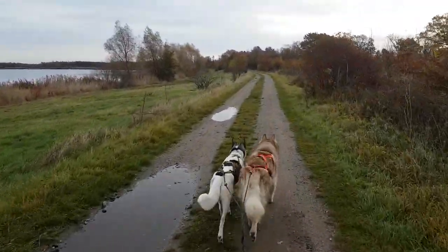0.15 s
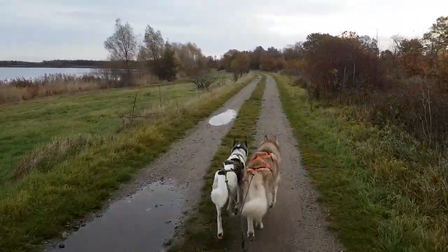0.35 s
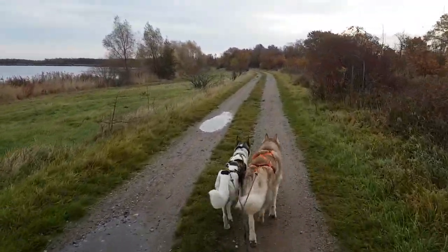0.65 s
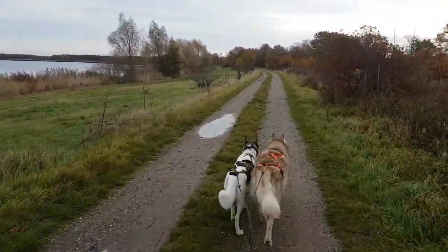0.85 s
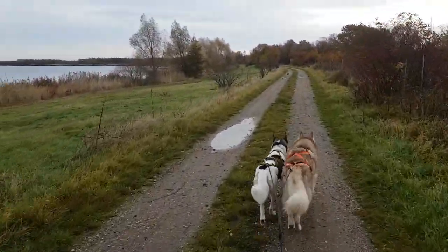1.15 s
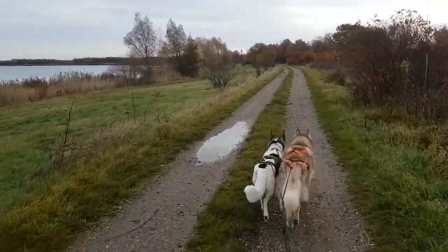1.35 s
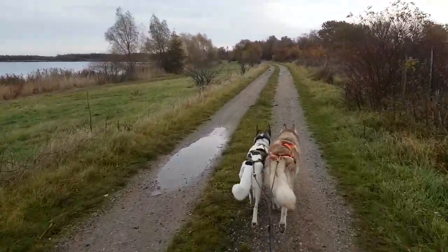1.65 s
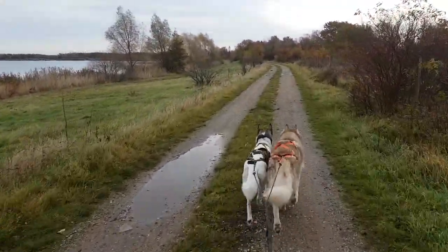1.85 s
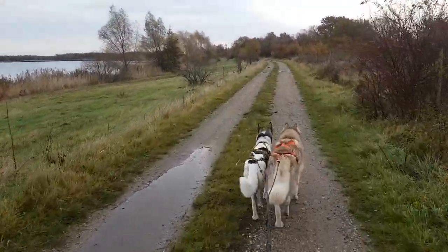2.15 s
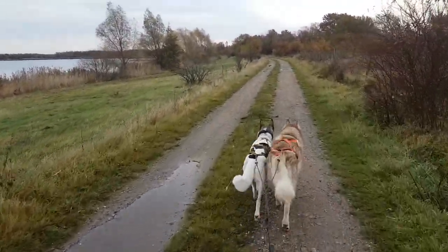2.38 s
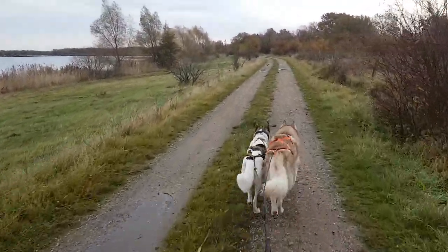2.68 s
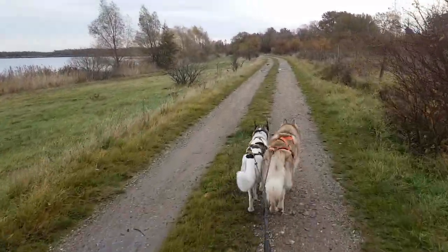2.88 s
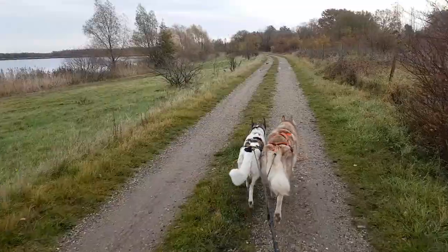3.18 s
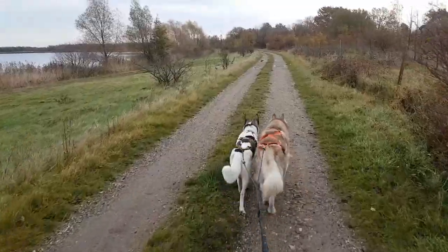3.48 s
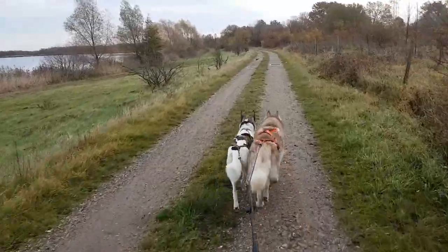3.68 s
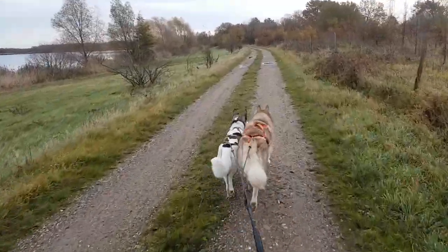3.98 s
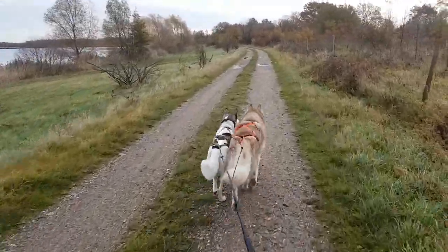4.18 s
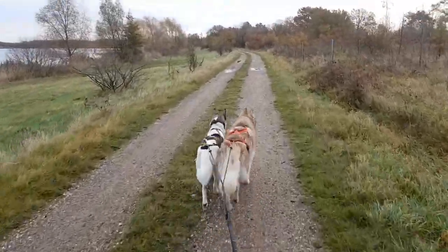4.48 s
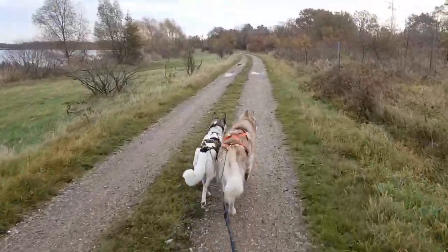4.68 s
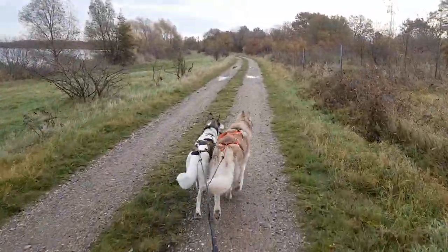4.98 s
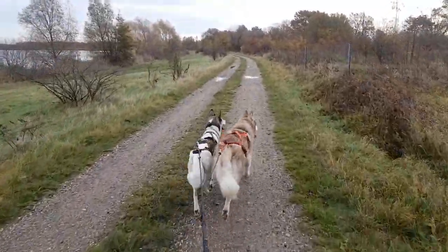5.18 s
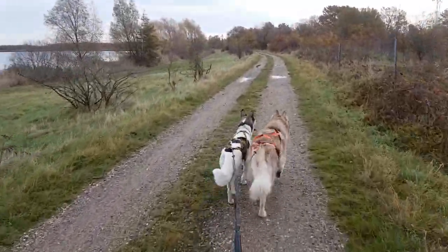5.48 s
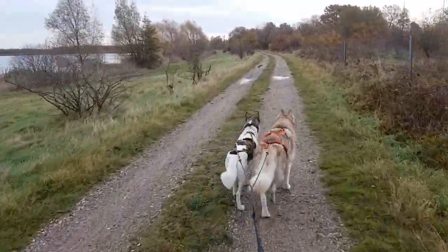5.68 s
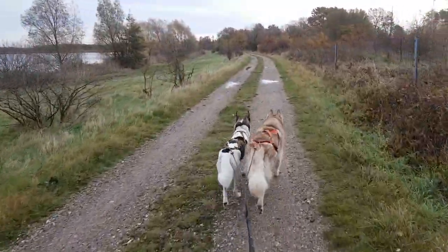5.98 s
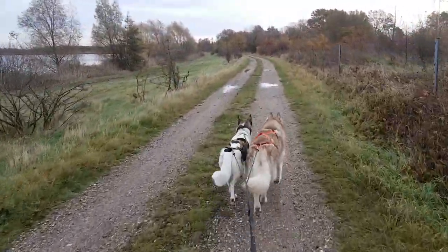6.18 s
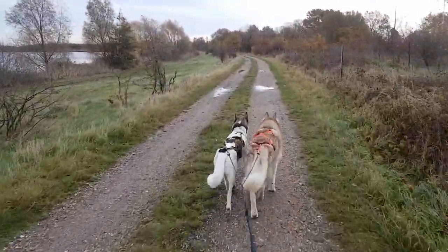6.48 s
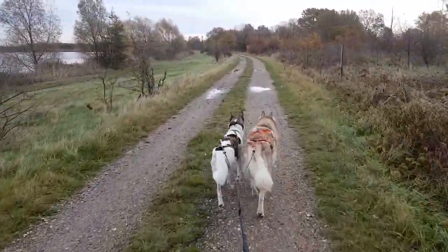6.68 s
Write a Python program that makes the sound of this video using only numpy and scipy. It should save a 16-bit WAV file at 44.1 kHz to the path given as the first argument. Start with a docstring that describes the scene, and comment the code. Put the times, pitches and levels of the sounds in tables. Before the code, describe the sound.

A dog-drawn cart rolls along a gritty track: dense crunching grains, snapping pebbles, hissing wet sand, dull jolts and a faint low rumble.

```python
"""Damp gravel crunches under the tyres of a small cart pulled by two dogs, heard from the rider's place.
The crunch is a dense random rain of grain clicks; larger stones grind as shaped noise, then snap and knock.
Pebbles tick and rebound, sand hisses and specks click as coloured noise, and the tyres drone likewise.
Jolts are short decaying tones, and low noise is the moving air that buffets two microphone ports."""
import sys
import numpy as np
from scipy import signal
from scipy.fft import rfft, irfft, next_fast_len
from scipy.io import wavfile
from scipy.ndimage import uniform_filter1d, map_coordinates

SR = 44100
rng = np.random.default_rng(int(sys.argv[2]) if len(sys.argv) > 2 else 0)


def store_pcm(level_fs):
    """Save levels as 16-bit WAV."""
    pcm = np.round(np.clip(level_fs, -1, 1) * 32767).astype(np.int16)
    wavfile.write(sys.argv[1], SR, np.atleast_2d(pcm).T)


N = 302085


def amp(db):
    """Turn dB into a plain gain."""
    return 10 ** (np.asarray(db) / 20)


def unit(x):
    """Scale x to an average strength (rms) of 1."""
    return x / np.sqrt(np.mean(x ** 2) + 1e-20)


def along(points, hz):
    """Read a curve of (Hz, value) points on a log frequency axis."""
    f, v = np.transpose(points)
    return np.interp(np.log(hz + 1), np.log(f + 1), v)


def curves(rows):
    """One value per sample for each column after the time."""
    s, *cols = np.transpose(rows)
    return [np.interp(np.arange(N) / SR, s, c) for c in cols]


def wobble(rate):
    """A smooth random curve with rate knots a second."""
    knots = rng.standard_normal(int(N * rate / SR) + 4)
    return map_coordinates(knots, [np.arange(N) * rate / SR])


def swells(rows):
    """Summed power of (centre s, dB, length s) events; length is the time spent above half power."""
    t = np.arange(0, N, 20) / SR
    power = sum(amp(db) ** 2 * .5 ** ((2 * (t - s) / length) ** 2) for s, db, length in rows)
    return np.interp(np.arange(N) / SR, t, power)


def filtered(x, response):
    """Shape the spectrum of x by a response of frequency."""
    m = next_fast_len(x.shape[-1] + SR // 4)
    spectrum = rfft(x, m) * response(np.fft.rfftfreq(m, 1 / SR))
    return irfft(spectrum, m)[..., :x.shape[-1]]


def add(track, s, sound):
    """Mix a stereo sound in at s seconds."""
    room = track[:, max(round(s * SR), 0):][:, :sound.shape[1]]
    room += sound[:, :room.shape[1]]


def lean(right_db):
    """Left and right gains that favour the right port by right_db in all."""
    return amp(np.array([-right_db, right_db]) / 2)


def rush(spectrum, alike):
    """Coloured stereo noise of rms 1; alike says how similar left and right are at each frequency."""
    def shape(hz):
        turn = np.arccos(np.clip(along(alike, hz), -1, 1)) / 2
        return amp(along(spectrum, hz)) * [np.cos(turn), np.sin(turn)]

    mid, side = filtered(rng.standard_normal((2, N)), shape)
    return unit(np.array([mid + side, mid - side]))


def click(spectrum, shape_db, port_db, lag_ms, scatter_ms, size=1024, count=33):
    """A stone's stereo click of energy 1: its shape bends the colour, its place shifts the ports in time."""
    hz = np.fft.rfftfreq(size, 1 / SR)
    places = [np.linspace(0, count - 1, len(hz))]
    own, left, right = [map_coordinates(k, places) for k in rng.standard_normal((3, count))]
    # short waves differ more between the ports
    ports = np.array([left, right]) * port_db * np.sqrt(np.minimum(hz / 6000, 1))
    cepstrum = irfft(np.log(amp(along(spectrum, hz) + shape_db * own + ports)))
    cepstrum[:, 1:size // 2] *= 2  # causal: a sharp start, then the ring
    cepstrum[:, size // 2 + 1:] = 0
    lag = (lag_ms + scatter_ms * rng.standard_normal()) / 1000
    delay = 6 / SR + np.array([[-lag], [lag]]) / 2
    wave = irfft(np.exp(rfft(cepstrum) - 2j * np.pi * hz * delay))[:, :size // 2]
    return wave / np.sqrt(np.sum(wave ** 2) / 2)


def crunch(level, per_second, size_db, clump_db, flutter_db, count=20):
    """Grit of many shapes is crushed in little clumps; the forces vary at random from grain to grain."""
    # The colour of crushed grit. Each row: frequency in Hz, level in dB per Hz.
    grit_colour = [(150, -24), (550, -12.5), (1000, -5), (1400, -8), (1920, -8), (2060, -1.5), (2300, 4.5),
                   (2600, -5), (2920, 5), (3200, 1), (3450, 3.5), (4000, -3.5), (5000, -15.5), (5800, -10),
                   (7200, -40), (9500, -31), (16000, -24)]
    hit = rng.random(N) < per_second / SR
    force = hit * amp(size_db * np.minimum(rng.standard_normal(N), 2) + clump_db * wobble(140))
    # the grains under a tyre share its load, so one large grain relieves its neighbours
    force /= np.sqrt(np.abs(uniform_filter1d(force ** 2, size=1500)) + 1e-9)
    shape = rng.integers(count, size=N)
    grit = np.zeros((2, N))
    for k in range(count):
        grain = click(grit_colour, shape_db=4.5, port_db=4.0, lag_ms=0.021, scatter_ms=0.042)
        own_force = force * (shape == k)
        grit += signal.oaconvolve(own_force[None], grain, axes=1)[:, :N]
    return unit(grit) * level * amp(flutter_db * wobble(45))


def contact_db():
    """The tyres skip or meet bare earth, and the crunch eases in these lulls."""
    # The lulls. Each row: centre in seconds, change in dB, length in seconds between half-depth points.
    lulls = [(1.607, -6, 0.069), (2.272, -4.5, 0.13), (2.546, -9, 0.065), (2.693, -4.5, .05),
             (3.045, -3.5, 0.047), (3.546, -10, 0.026), (4.155, -10, 0.02), (4.219, -11, 0.026),
             (4.341, -14, 0.045), (4.774, -14, 0.043), (5.316, -7, 0.038), (5.613, -5.5, .06),
             (6.02, -9.5, 0.11), (6.15, -10, 0.028)]
    t = np.arange(0, N, 20) / SR
    change_db = sum(db * .5 ** ((2 * (t - s) / length) ** 2) for s, db, length in lulls)
    return np.interp(np.arange(N) / SR, t, change_db)


def stone_colour(ring_hz):
    """The colour that all stones share, with this one's own resonance on top."""
    # The shared colour of snapping stones. Each row: frequency in Hz, level in dB per Hz.
    shared_colour = [(150, -19), (600, -23), (1400, -8), (1900, -2), (2300, 2), (2650, -2), (3300, 1.5),
                     (4000, -3), (5000, -9), (7000, -27), (14000, -21), (17000, -24)]
    height_db, half_width_octaves = 6.5, 0.26
    hz = np.geomspace(100, SR / 2, 90)
    resonance_db = height_db * np.exp(-(np.log2(hz / ring_hz) / half_width_octaves) ** 2)
    return np.column_stack([hz, along(shared_colour, hz) + resonance_db])


def stones(lead_s=.012, snap_energy_db=7.5, knock_energy_db=15.0):
    """A pinched stone grinds on its neighbours, snaps and knocks the wheel in one crack, then scrapes to rest."""
    # The larger stones under a tyre. Each row: time of the snap in seconds, snap level in dB,
    # pitch of the ring in Hz, knock level in dB.
    stone_rows = [(0.137, -43, 1900, -41), (0.3071, -31, 2400, -33), (0.3125, -18.5, 2500, -35.5),
                  (0.379, -19, 3270, -42), (0.3817, -21, 3400, -38), (0.41, -24, 3030, -36),
                  (0.4165, -21.5, 3600, -42), (0.5566, -26, 3400, -54), (0.901, -42, 2300, -35),
                  (1.392, -29, 2200, -31.5), (1.465, -26.5, 3300, -41), (1.532, -25, 2400, -46),
                  (1.9072, -17.5, 3200, -40), (1.9513, -26, 2500, -34), (1.9663, -15.5, 2900, -37),
                  (1.9785, -24, 3700, -52), (2.0181, -24, 2600, -38), (2.04, -24, 3800, -52),
                  (2.0788, -20.5, 2900, -43), (2.1015, -18.5, 2600, -44), (2.115, -30, 2720, -27),
                  (2.2179, -22.5, 2610, -35.5), (2.3124, -19, 2700, -36), (2.319, -13.5, 3000, -45),
                  (2.3206, -14, 2900, -27), (2.3249, -18.5, 3100, -48), (2.4667, -10, 3020, -36),
                  (2.4769, -19, 2800, -52), (2.6062, -22, 3100, -48), (2.632, -22, 3400, -47),
                  (2.6478, -23, 3600, -48), (2.7314, -30, 2700, -35.5), (2.7893, -17, 3000, -36),
                  (2.8552, -28, 2200, -37), (2.8825, -20, 2700, -37), (2.9256, -22, 3100, -46),
                  (2.9816, -22.5, 3300, -39), (2.9864, -21, 3300, -39.5), (3.1624, -29, 3000, -47),
                  (3.2862, -19, 2980, -48), (3.2937, -20.5, 2700, -45), (3.3661, -25, 3000, -45),
                  (3.3795, -33, 1980, -33), (3.3838, -17, 3100, -41), (3.429, -23, 3300, -48),
                  (3.4545, -19, 3000, -42), (3.518, -35, 1500, -35), (3.579, -12, 3250, -34.5),
                  (3.6811, -23, 3000, -47), (3.741, -42, 1300, -33), (3.902, -24, 3000, -39),
                  (4.0821, -19.5, 3000, -46), (4.1763, -23.5, 3020, -36.5), (4.3696, -25, 2500, -35),
                  (4.539, -25, 2600, -36), (4.6559, -25, 2800, -38), (4.814, -22, 3200, -30.5),
                  (4.9227, -31, 1400, -31), (4.9497, -21, 3200, -44), (5.01, -25.5, 3100, -40),
                  (5.2, -22, 2500, -35.5), (5.5054, -27, 2900, -46), (5.6761, -28, 2510, -36.5),
                  (5.7103, -22, 2700, -46), (5.8227, -26, 3200, -48), (6.2077, -28, 2800, -41),
                  (6.2324, -26.5, 3000, -48), (6.273, -22, 2980, -43), (6.4182, -24, 2500, -44),
                  (6.4324, -19, 2500, -37), (6.4346, -15.5, 2700, -36), (6.4846, -28, 2500, -39),
                  (6.5415, -28, 2600, -48), (6.5647, -29, 3300, -47), (6.5983, -24, 2600, -38),
                  (6.7273, -21, 2800, -42), (6.8053, -25.5, 2400, -40)]
    # The dull knock on the wheel. Each row: multiple of the knock's pitch, level in dB per Hz.
    knock_colour = [(.15, -13), (.55, -8), (1, 2), (1.35, -2), (3, -12), (8, -35)]
    knock_ratio = .38  # knock pitch over ring pitch: big stones are low in both
    # grinding against its snap; the times are for a 60 dB rise before it and a 60 dB fall after it
    grind_db, crush_s, scrape_s = -20, .025, .04
    grain_share = .08  # share of samples with a grain of grinding
    out, lead = np.zeros((2, N)), round(lead_s * SR)
    t = np.arange(-lead, SR // 30) / SR
    grinding = amp(grind_db - 60 * np.maximum(t / scrape_s, -t / crush_s))
    hz = np.linspace(40, SR / 2, 512)
    for s, snap_db, ring_hz, knock_db in stone_rows:
        force = grinding * rng.standard_normal(len(t)) * (rng.random(len(t)) < grain_share)
        force[lead] = 1  # the snap itself
        snap = amp(snap_db + snap_energy_db) * unit(amp(along(stone_colour(ring_hz), hz)))
        knock_points = np.multiply(knock_colour, [knock_ratio * ring_hz, 1])
        knock = amp(knock_db + knock_energy_db) * unit(amp(along(knock_points, hz)))
        power = snap ** 2 + knock ** 2
        crack_colour = np.column_stack([hz, 10 * np.log10(power)])
        crack = click(crack_colour, shape_db=1.5, port_db=2, lag_ms=.01, scatter_ms=.016)
        add(out, s + t[0], signal.fftconvolve(force[None], np.sqrt(power.mean()) * crack, axes=1))
    return out


def pebbles(ground_db):
    """Small stones tick and rebound at random, louder where more gravel lies."""
    per_second, energy_db, spread_db = 30, 25.5, 2  # energy_db: over one sample of crunch
    middle_hz, pitch_octaves = 2900, 0.66  # where they ring, and the scatter of their pitch
    rebound_s, rebound_db = 0.0071, -9  # latest time of the second strike, and its weaker level
    out = np.zeros((2, N))
    for slot in range(int(per_second * N / SR)):
        s = (slot + rng.random()) / per_second  # one pebble somewhere in each slot
        ring_hz = middle_hz * 2 ** (pitch_octaves * rng.standard_normal())
        tick = click(stone_colour(ring_hz), shape_db=3.5, port_db=3, lag_ms=.008, scatter_ms=.045)
        scatter_db = spread_db * np.clip(rng.standard_normal(), -2, 1)
        tick = tick * amp(ground_db[int(s * SR)] + energy_db + scatter_db)
        add(out, s, tick)
        add(out, s + rebound_s * rng.random(), amp(rebound_db) * tick)
    return out


def sand(level):
    """Fine wet sand hisses off the tread in quick flurries."""
    # The colour of the hiss. Each row: frequency in Hz, level in dB per Hz.
    sand_colour = [(300, -30), (700, -4), (1500, 6.5), (3000, 13), (5700, 3.5), (7600, -0.5), (9500, 1.5),
                   (11500, -2), (13500, 0), (16000, -3.5)]
    # How alike left and right are. Each row: frequency in Hz, likeness (1 = the same, 0 = unrelated).
    likeness = [(200, .65), (500, 0.51), (1500, 0.19), (3000, 0.72), (5000, 0.092), (9000, 0.026)]
    flurries = unit(amp(1.89 * wobble(80) + 2.0 * wobble(600)))
    return rush(sand_colour, likeness) * flurries * level


def specks():
    """Tiny hard flung specks give a short, very bright tick: noise that dies away fast."""
    # The ticks. Each row: start in seconds, level in dB, time in seconds to fall by 60 dB.
    speck_rows = [(2.3688, -28.5, .03), (4.1412, -36, .012), (4.422, -40, .02), (5.9158, -24.5, .022)]
    # The colour of a tick. Each row: frequency in Hz, level in dB per Hz.
    tick_colour = [(3000, -30), (8000, -2), (9500, 5.5), (13500, 6.5), (16000, -6)]
    out, t = np.zeros((2, N)), np.arange(SR // 25) / SR
    for s, db, t60 in speck_rows:
        add(out, s, amp(db - 4.5 - 60 * t / t60) * rng.standard_normal((2, len(t))))
    return filtered(out, lambda hz: amp(along(tick_colour, hz)))


def tyres():
    """The rough ground shakes the tyres, which drone in one broad resonance."""
    # The strength of the drone. Each row: time in seconds, level in dB.
    roll = [(0, -51.5), (0.85, -51), (1.15, -49), (1.5, -51.5), (2.25, -46), (2.65, -50.5), (3.05, -50),
            (4.35, -48), (4.78, -51.5), (4.9, -45.5), (5.05, -51), (5.9, -48.5), (6.85, -51)]
    # The colour of the drone. Each row: frequency in Hz, level in dB per Hz.
    tyre_colour = [(30, -13), (90, -12), (235, -9), (280, -2), (330, 2.5), (390, -1.5), (480, -6.5),
                   (640, -12), (680, -8.5), (720, -16.5), (1200, -17.5), (4000, -35)]
    drone_db, = curves(roll)
    flutter_db = .7 * wobble(25)
    return rush(tyre_colour, [(200, 0.77), (500, 0.91)]) * amp(drone_db + flutter_db)


def jolts():
    """A rut thumps the whole cart; a smaller bump rings the tyre for a few cycles."""
    # The ruts and bumps. Each row: time of the peak in seconds, level in dB, pitch in Hz,
    # cycles in which the swing shrinks to about a third.
    jolt_rows = [(1.601, -33, 108, .9), (1.865, -37, 120, 1.5), (2.017, -39, 360, 2.5),
                 (2.83, -39, 100, 1.6), (2.866, -39, 60, .7), (3.108, -37, 350, 2.5),
                 (3.522, -41, 360, 2.2), (3.555, -39, 100, 2.2), (3.741, -40, 378, 2.2),
                 (4.89, -39, 352, 2.5), (4.946, -40, 360, 2.2), (5.51, -39, 342, 2.5),
                 (5.533, -34, 112, 1.3), (6.476, -39, 88, 1.6), (6.645, -39, 100, 1.4)]
    rise, right_db = 1.8, 1.0  # growth in nepers (factors of e) a cycle; lean to the right in dB
    out, t = np.zeros((2, N)), np.arange(-SR // 25, SR // 10) / SR
    for s, db, hz, cycles in jolt_rows:
        swing = np.exp(np.minimum(t * hz * rise, -t * hz / cycles))
        thump = swing * np.cos(2 * np.pi * hz * t)
        add(out, s + t[0], amp(db) * lean(right_db)[:, None] * thump)
    return out


def wind():
    """The cart's own speed makes a breeze, with gusts on top; eddies strike each port separately."""
    # The breeze. Each row: time in seconds, level in dB.
    breeze = [(0, -53), (2.2, -52.5), (3.5, -54), (4, -53.5), (4.9, -58), (5.4, -51.5), (6.85, -53)]
    # The gusts. Each row: centre in seconds, level in dB, length in seconds between half-power points.
    gusts = [(0.6, -49, 0.19), (1.72, -42, 0.068), (1.88, -47, 0.1), (2.85, -49.5, 0.48),
             (3.28, -45, 0.061), (3.62, -44.5, 0.083), (5.28, -46, 0.11), (6.48, -43.5, 0.057)]
    # The colour of the buffeting. Each row: frequency in Hz, level in dB per Hz.
    buffet_colour = [(12, -34), (25, -17), (60, -1.5), (110, -1), (200, -5.5), (350, -17), (700, -22),
                     (2000, -35), (6000, -80)]
    breeze_db, = curves(breeze)
    strength = np.sqrt(amp(breeze_db + 1.8 * wobble(11)) ** 2 + swells(gusts))
    eddies = amp(2.8 * np.array([wobble(28), wobble(28)]))
    return unit(rush(buffet_colour, [(50, 0.25), (300, 0.042)]) * eddies) * strength


def scene(bumps_db=1.93):
    """Loose patches and bumps raise the crunch, heaps add finer grains, and the sand follows a little."""
    # Loose grit under the tyres, least on a wet patch. Each row: time in seconds, crunch level in dB.
    loose_grit = [(0, -58.5), (0.185, -57), (0.21, -47.5), (0.62, -51.5), (1.0, -61.5), (1.3, -72),
                  (1.45, -56), (1.65, -53), (1.98, -47.5), (2.52, -47.5), (2.84, -45.5), (3.05, -49.5),
                  (3.8, -46), (4.3, -50), (4.95, -49.5), (6.02, -46), (6.45, -44.5), (6.85, -46.5)]
    # A paw or a wheel meets a heap of loose gravel. Each row: centre in seconds, level in dB,
    # length in seconds between half-power points.
    scuffs = [(0.384, -41, 0.006), (0.555, -42, 0.015), (1.394, -48, 0.017), (1.528, -41.5, 0.014),
              (1.694, -37.5, 0.016), (2.013, -39, 0.013), (2.107, -40, .006), (2.195, -39.5, 0.0071),
              (2.791, -35, .005), (2.89, -41, 0.016), (3.149, -38.5, 0.012), (3.224, -39, 0.014),
              (3.412, -40, 0.032), (4.096, -44, 0.012), (4.838, -39, 0.013), (4.905, -42, 0.038),
              (6.085, -44.5, 0.038), (6.265, -38, 0.012), (6.604, -44, 0.019)]
    crunch_gain_db = -1  # the rolling crunch against the level of loose grit
    # hiss on average ground; its dB per dB of loose grit, and per dB of a bump, lull or scuff
    sand_mean_db, sand_follows, sand_jolts = -47, 0.34, 0.41
    grit_db, = curves(loose_grit)
    ground_db = grit_db + contact_db()
    rolling = amp(ground_db + bumps_db * wobble(21.924))
    heaps = swells(scuffs)
    crunch_db = 10 * np.log10(rolling ** 2 + heaps)
    sand_db = sand_mean_db + sand_follows * (grit_db - grit_db.mean())
    sand_db = sand_db + sand_jolts * (crunch_db - grit_db)
    coarse = crunch(rolling * amp(crunch_gain_db), per_second=480, size_db=5.5, clump_db=2.0, flutter_db=2.4)
    fine = crunch(np.sqrt(heaps), per_second=2200, size_db=3, clump_db=1.2, flutter_db=.6, count=10)
    gravel = coarse + fine + sand(amp(sand_db)) + pebbles(ground_db)
    return gravel + stones() + specks() + tyres() + jolts() + wind()


def record(dry):
    """The two microphone ports colour the sound differently; nothing passes above the band limit."""
    # The two ports. Each row: frequency in Hz, right minus left in dB.
    port_balance = [(60, -2.5), (180, -3.5), (320, 1.5), (1300, -1.5), (2300, 4), (3400, 2), (4500, -0.5),
                    (5700, 5), (7500, 0), (9800, 4.5), (12000, 2), (15000, 6)]
    top_hz = 15950
    return filtered(dry, lambda hz: lean(along(port_balance, hz)) * (hz < top_hz))


dry = scene()
out = record(dry)
store_pcm(out)
```